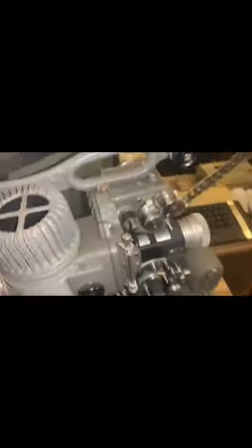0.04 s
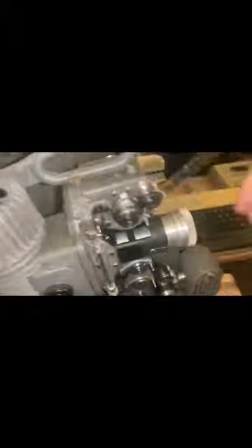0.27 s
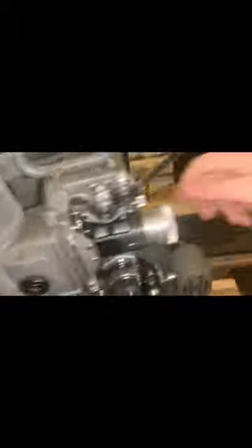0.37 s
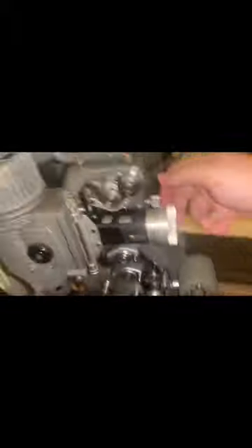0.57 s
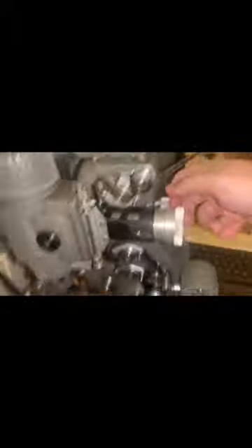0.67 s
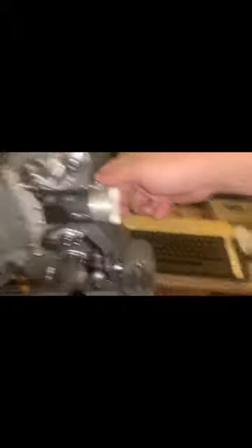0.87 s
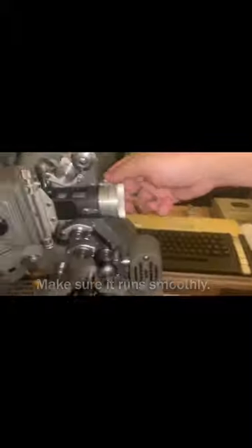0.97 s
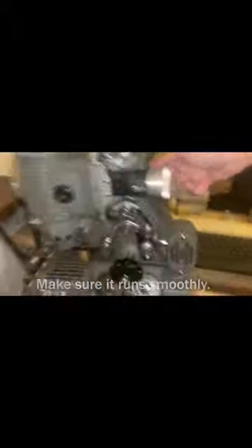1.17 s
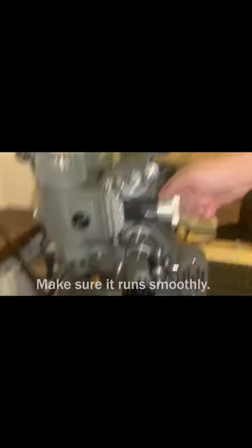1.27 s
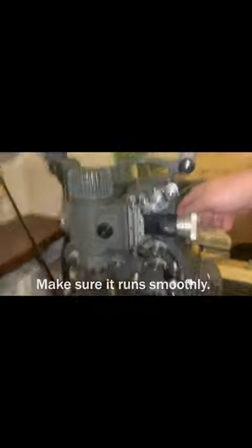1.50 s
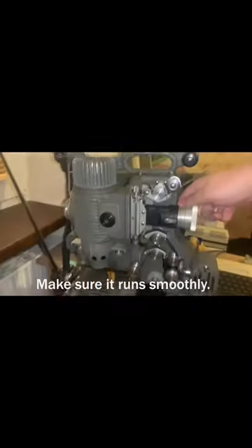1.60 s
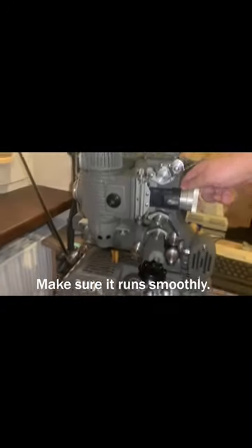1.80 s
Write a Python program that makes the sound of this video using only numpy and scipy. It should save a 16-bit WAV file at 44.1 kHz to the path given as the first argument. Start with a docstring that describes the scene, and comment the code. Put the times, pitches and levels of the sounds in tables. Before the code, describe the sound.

A film projector's lens barrel is turned by hand, close by in a quiet room, making dry, scraping swishes over low handling rumble. From about 0.2 seconds, fingers tap and scuff the hollow housing. The brightest swish comes near 0.7 seconds, and five soft knocks fall between then and 1.4 seconds, the strongest at 1 second. After a small scratch at 1.6 seconds, the rubbing and rumble fade.

```python
"""A hand turns the lens barrel of a film projector on a desk, close to a handheld camera.
From the start, each turn is a dry swish of tiny slips, and the handling rumbles in a quiet room.
From about 0.2 s, fingers tap and scuff the hollow housing, and the barrel catches now and then.
Near 0.7 s comes the brightest swish and the first of five soft knocks that fall quickly in pitch.
After a last small scratch at 1.6 s, the rubbing and the rumble fade away."""
import sys
import numpy as np
from scipy import signal
from scipy.fft import rfft, irfft
from scipy.io import wavfile
from scipy.ndimage import uniform_filter1d

SR = 44100
rng = np.random.default_rng(int(sys.argv[2]) if len(sys.argv) > 2 else 0)


def pcm_store(signal):
    """Save signal as 16-bit PCM."""
    levels = np.round(np.clip(np.atleast_2d(signal), -1, 1) * 32767)
    wavfile.write(sys.argv[1], SR, levels.astype(np.int16).T)


N = 81585
T, HZ = np.arange(N) / SR, np.fft.rfftfreq(N, 1 / SR)

# Levels in the tables are relative: the functions scale them further.
# How loud the three parts of the rubbing are: time_s, hiss_db, fizz_db, scrape_db
RUB_LEVELS = [(0, -65.5, -72.5, -60.5), (.158, -91.5, -88.5, -84.5), (.19, -77.5, -71, -81),
              (.236, -64, -64, -52.5), (.39, -63.5, -56.5, -67), (.455, -66.5, -59.5, -61.5),
              (.51, -75.5, -81, -78), (.586, -83, -95, -77), (.612, -61, -55, -67),
              (.648, -53.5, -50, -64.5), (.71, -54, -50.5, -61.5), (.76, -63, -57, -61),
              (.83, -72.5, -86, -67), (.875, -72, -81.5, -71.5), (.998, -60, -58, -56),
              (1.082, -60, -59.5, -60), (1.164, -70.5, -78.5, -64.5), (1.23, -69.5, -68, -61.5),
              (1.324, -59.5, -55.5, -61.5), (1.4, -62.5, -57.5, -54), (1.488, -76, -87.5, -64),
              (1.53, -67, -71, -54), (1.58, -69, -79, -61.5), (1.622, -63.5, -62, -60),
              (1.73, -83, -91, -68), (1.85, -98, -93.5, -84.5)]
# The tone of the bright hiss, the finer fizz and the lower scrape: frequency_hz, level_db
HISS_TONE = [(1200, -27), (2000, -8.5), (3000, 5.5), (4400, 6), (5600, 2), (7000, 2), (8500, -51.5),
             (10500, -8.5), (14000, -43)]
FIZZ_TONE = [(5500, -15), (8000, -4), (9400, -1.5), (11200, -2), (13000, -3), (14500, -8.5), (16000, 0)]
SCRAPE_TONE = [(300, -4), (700, 1), (1000, 7), (1500, 12), (2400, 4.5), (3000, -5.5), (4500, -22)]
# The pitches at which the metal barrel rings: pitch_hz, width_hz, level_db
BARREL_RINGS = [(1130, 21, -10), (1440, 180, -8), (2225, 35, 0), (2524, 15, 8.5), (3177, 20, 18),
                (3880, 78, -14), (4000, 43, 14)]
# How loud the handling rumble is: time_s, deep_db, boom_db
RUMBLE_LEVELS = [(0, -61, -55.5), (.05, -55, -57), (.1, -64, -73), (.2, -61, -67), (.256, -41.5, -47.5),
                 (.314, -59, -55), (.36, -44, -50.5), (.44, -61.5, -57.5), (.57, -51.5, -51.5),
                 (.64, -67, -66), (.72, -69, -45), (.82, -61, -46.5), (.95, -64.5, -58), (1.09, -69, -74),
                 (1.21, -57.5, -55), (1.28, -65, -70), (1.38, -68, -74), (1.45, -48, -55.5),
                 (1.55, -57.5, -59), (1.65, -61.5, -67), (1.74, -70.5, -72), (1.85, -77, -77)]
# The tone of the deep rumble, the boom and the quiet room: frequency_hz, level_db
DEEP_TONE = [(15, -25), (30, -13), (45, 2), (62, -0.5), (85, -8.5), (130, -25), (500, -51.5)]
BOOM_TONE = [(40, -38), (70, -5), (95, 0.5), (125, -11.5), (250, -17.5), (500, -35), (1500, -63)]
ROOM_TONE = [(20, -24), (50, -2.5), (110, -5), (200, -18.5), (300, -3.5), (420, -6), (560, -20.5),
             (1500, -23), (4000, -48), (16000, -38)]
# Light fingertip taps: start_s, level_db, pitch_hz
TAPS = [(.1735, -48.5, 670), (.2125, -61, 620), (.3225, -41, 305), (.341, -40.5, 557), (.552, -46.5, 596),
        (.733, -41.5, 514), (.7785, -39.5, 550), (1.1915, -42, 680)]
# Small scratches as the barrel catches: start_s, level_db, decay_s, pitch_hz
CATCHES = [(.1815, -59, .003, 6300), (0.21, -60, 0.013, 2340), (1.192, -49, .002, 1860),
           (1.199, -50, 0.0076, 3000), (1.376, -50, 0.013, 1590), (1.597, -55, 0.0024, 9900)]
# Finger scuffs, each with a dull thump set against its level: start_s, length_s, level_db, thump_db
SCUFFS = [(0.207, 0.053, -50.5, -3.5), (0.283, 0.094, -54, 1), (0.488, 0.091, -60, -2),
          (0.702, 0.061, -50.5, -13), (0.863, 0.063, -56, -5.5), (1.019, 0.02, -71, 15.5),
          (1.147, 0.077, -58, 2), (1.384, 0.062, -60, 7.5)]
# The tone of a scuff's rasp and of its thump: frequency_hz, level_db
RASP_TONE = [(120, 3), (300, -4), (450, -7.5), (700, 5.5), (950, -0.5), (1300, -7), (2200, -2), (5000, -28)]
THUMP_TONE = [(50, -47), (100, -5), (170, -1), (300, -3), (450, -0.5), (800, -65)]
# The pitches at which the hollow housing rings: pitch_hz, width_hz, level_db
HOUSING_RINGS = [(295, 35, 3.5), (404, 96, -3), (575, 98, -5.5), (704, 80, -2), (830, 140, -17.5),
                 (1210, 450, -10.5)]
# Soft knocks: start_s, thud_db, click_db, crack_db, pitch_drop_hz, fall_s, swell_s
KNOCKS = [(.696, -39.5, -78, -72, 968, .0055, 0.018), (0.8474, -44, -40, -42, 1855, 0.002, 0.0089),
          (1.0049, -29, -73, -78, 1540, 0.0027, 0.0072), (1.127, -41.5, -45, -45, 1017, 0.00556, 0.012),
          (1.387, -42.5, -70, -51, 917, 0.0077, 0.051)]
# The tone of the crack that starts a knock: frequency_hz, level_db
CRACK_TONE = [(200, -8), (700, 18), (1400, 6.5), (2500, 8), (3500, -19), (8000, -26), (16000, -47)]
# How alike left and right sound: frequency_hz, likeness (0 unrelated, 1 the same)
STEREO_LIKENESS = [(40, 0.98), (150, 0.87), (300, 0.86), (700, 0.77), (1300, 0.16), (2800, 0.083),
                   (5500, 0.1), (6700, 0.45), (8000, 1), (16000, .995)]
# How much later the left microphone hears than the right: frequency_hz, lag_cycles
LEFT_LAG = [(0, 0), (250, .05), (800, .27), (3000, .55), (6400, 1), (8550, 1.5), (11000, 2), (13350, 2.5),
            (15600, 3), (22050, 4.3)]


def amp(db):
    """Turns decibels into a number to multiply by."""
    return 10 ** (np.asarray(db) / 20)


def unit(x):
    """Scales a sound to an average power of one."""
    return x / np.sqrt(np.mean(x ** 2) + 1e-20)


def noise():
    """Plain noise, unrelated in left and right."""
    return rng.standard_normal((2, N))


def across_pitch(points):
    """Joins a table's points into a value for every frequency."""
    hz, value = np.transpose(points)
    return np.interp(np.log(HZ + 1), np.log(hz), value)


def level(rows, column):
    """Joins one column of decibels into a volume for every moment."""
    rows = np.array(rows)
    return amp(np.interp(T, rows[:, 0], rows[:, column]))


def colour(pair, tone):
    """Gives two unrelated sounds a tone and blends them so left and right are partly alike."""
    a, b = rfft(pair)
    likeness = np.clip(across_pitch(STEREO_LIKENESS), 0, 1)
    shared, apart = a * np.sqrt(1 + likeness), b * np.sqrt(1 - likeness)
    stereo = np.array([shared + apart, shared - apart])
    return unit(irfft(stereo * amp(across_pitch(tone)), N))


def friction(slips_per_s, spread_db):
    """Rubbing surfaces move in tiny slips, each a click of random size."""
    size = amp(spread_db * np.minimum(rng.exponential(1, (2, N)), 4))
    return unit(size * rng.choice([-1, 1], (2, N)) * (rng.random((2, N)) < slips_per_s / SR))


def echoes(x, fade_s):
    """A blur of echoes, about as strong as the sound, that dies by 60 dB in fade_s."""
    t = T[:SR // 2]
    ring = rng.standard_normal((2, len(t))) * amp(-60 * t / fade_s)
    return signal.fftconvolve(x, ring / np.linalg.norm(ring[0]), axes=1)[:, :N]


def resonate(pair, rings):
    """A shaken object rings at its own pitches."""
    response = 0
    for hz, width_hz, db in rings:
        off_pitch = 2j * (HZ - hz) / width_hz
        response += amp(db) / (1 + off_pitch) / (1 + off_pitch / 6)
    return unit(irfft(rfft(pair) * response, N))


def barrel_rub():
    """Tiny slips ring the metal barrel; hiss, fizz and scrape swell with each turn."""
    grainy_share = 0.45  # the rest of the power is smooth noise
    slips = np.sqrt(grainy_share) * friction(slips_per_s=7000, spread_db=2.5)
    slips += np.sqrt(1 - grainy_share) * noise()
    slips += amp(-2) * echoes(slips, fade_s=0.065)  # the metal rings on after each slip
    hiss = amp(3.5) * level(RUB_LEVELS, column=1) * colour(slips, HISS_TONE)
    fizz = amp(6) * level(RUB_LEVELS, column=2) * colour(slips, FIZZ_TONE)
    scrape = amp(-2) * colour(slips, SCRAPE_TONE) + amp(-11.5) * resonate(slips, BARREL_RINGS)
    return hiss + fizz + level(RUB_LEVELS, column=3) * scrape


def desk_rumble():
    """Handling shakes the desk: a deep rumble and a hollow boom."""
    deep = level(RUMBLE_LEVELS, column=1) * colour(noise(), DEEP_TONE)
    boom = level(RUMBLE_LEVELS, column=2) * colour(noise(), BOOM_TONE)
    return amp(-2.5) * (deep + boom)


def quiet_room():
    """A steady low noise with a faint hum."""
    hum_hz = 295.3
    return amp(-73.5) * colour(noise(), ROOM_TONE) + amp(-76) * np.sin(2 * np.pi * hum_hz * T)


def finger_taps():
    """Each soft fingertip tap rings for only a few vibrations."""
    swell_s = 0.0011
    out = np.zeros(N)
    for start_s, db, hz in TAPS:
        t = np.maximum(T - start_s, 0)
        shape = t / swell_s * np.exp(1 - t / swell_s)
        out += amp(db) * shape * np.sin(2 * np.pi * hz * t)
    return out


def barrel_catches():
    """The barrel sticks and lets go with a brief scratch."""
    step_octaves = 0.35
    out = np.zeros((2, N))
    for start_s, db, decay_s, hz in CATCHES:
        tone = [(hz * 2 ** (k * step_octaves), -6 * k * k) for k in range(-3, 4)]  # a hump around hz
        shape = (T > start_s) * np.exp(-abs(T - start_s) / decay_s)
        out += amp(db) * shape * colour(noise(), tone)
    return out


def finger_scuffs():
    """Fingers slip in short bursts on the hollow housing and make it ring."""
    rise_s, fall_s = 0.004, 0.044
    rasp = colour(friction(slips_per_s=900, spread_db=-0.5), RASP_TONE)
    thump = colour(friction(slips_per_s=900, spread_db=-0.5), THUMP_TONE)
    rasp = amp(-4) * rasp + amp(-4.5) * resonate(rasp, HOUSING_RINGS)
    out = np.zeros((2, N))
    for start_s, length_s, db, thump_db in SCUFFS:
        fade_in = np.clip((T - start_s) / rise_s, 0, 1)
        fade_out = np.clip((start_s + length_s - T) / fall_s + 0.5, 0, 1)
        out += amp(db) * fade_in * fade_out * (rasp + amp(thump_db) * thump)
    return out


def knocks():
    """High notes arrive first, low ones last: a crack slides into a thud and rattles the housing."""
    end_hz, crack_s, rattle_s = 78, 0.0031, 0.013
    snap = colour(noise(), CRACK_TONE)
    housing = resonate(snap, HOUSING_RINGS)
    roughness = 1 + 0.14 * unit(uniform_filter1d(rng.standard_normal(N), size=70))
    out = np.zeros((2, N))
    for start_s, thud_db, click_db, crack_db, drop_hz, fall_s, swell_s in KNOCKS:
        t = np.maximum(T - start_s, 1e-9)
        cycles = end_hz * t + drop_hz * t / (1 + t / fall_s)  # the pitch slides down to end_hz
        thud = amp(thud_db) * np.exp(-0.5 * (np.log(t / swell_s) / 0.53) ** 2)  # peaks at swell_s
        click = amp(click_db) * np.exp(-t / (2.7 * fall_s))
        slide = (thud + click) * roughness * np.sin(2 * np.pi * cycles)
        crack = snap * amp(crack_db) * np.exp(-t / crack_s)
        rattle = housing * amp(thud_db - 19.5) * np.exp(-t / rattle_s)
        out += (T > start_s) * (slide + crack + rattle)
    return out


def scene():
    """Adds up all the sounds; the scuffs, knocks and taps echo briefly in the room."""
    touches = finger_scuffs() + knocks() + finger_taps()
    background = quiet_room()
    barrel = barrel_rub() + barrel_catches()
    room_echo = amp(-11.5) * echoes(touches, fade_s=0.13)
    return barrel + touches + room_echo + desk_rumble() + background


def record(dry):
    """The left microphone hears slightly later than the right, and the very highest treble is cut."""
    lag_cycles = np.interp(HZ, *np.transpose(LEFT_LAG))
    left_only = np.array([[1], [0]])
    heard = irfft(rfft(dry) * np.exp(-2j * np.pi * lag_cycles * left_only), N)
    treble_cut = signal.firwin(511, cutoff=15720, window=("kaiser", 9), fs=SR)
    return signal.oaconvolve(heard, treble_cut[None], "same")


dry = scene()
out = record(dry)
pcm_store(out)
```